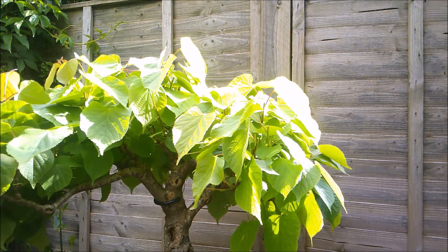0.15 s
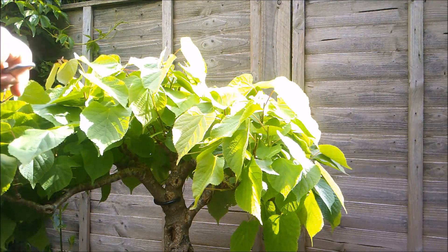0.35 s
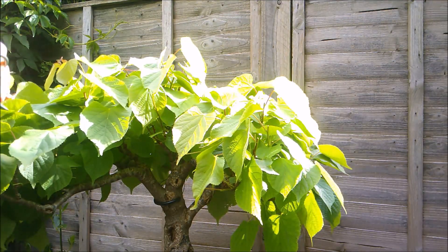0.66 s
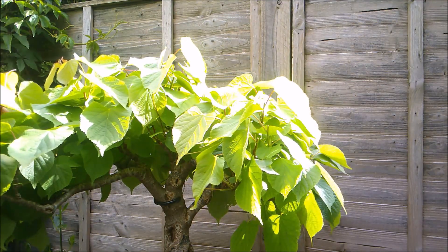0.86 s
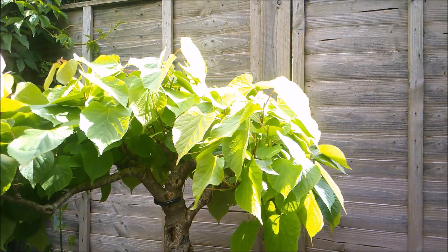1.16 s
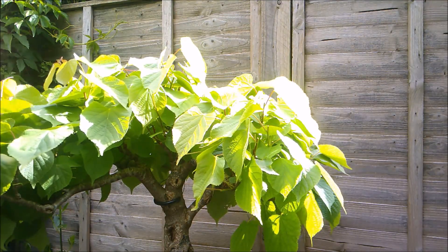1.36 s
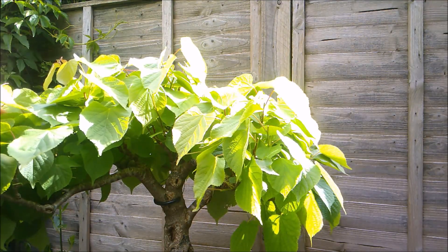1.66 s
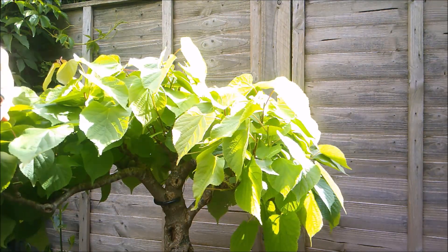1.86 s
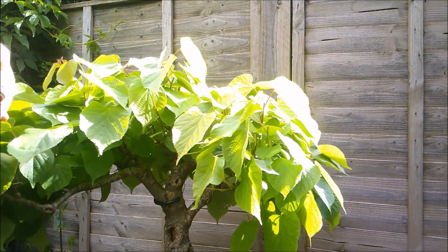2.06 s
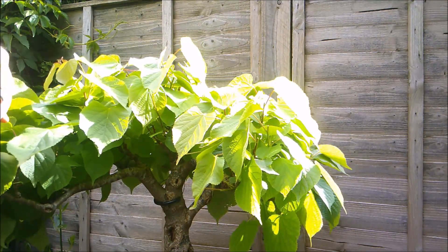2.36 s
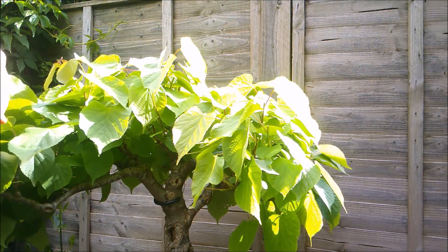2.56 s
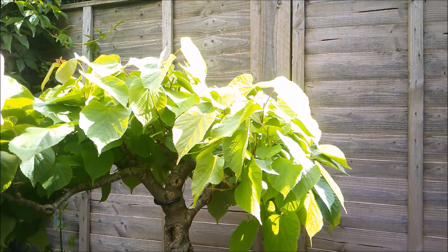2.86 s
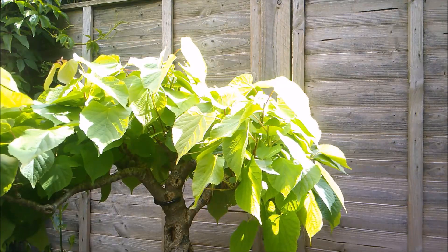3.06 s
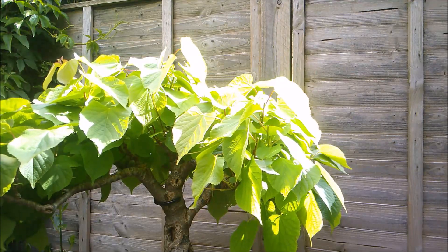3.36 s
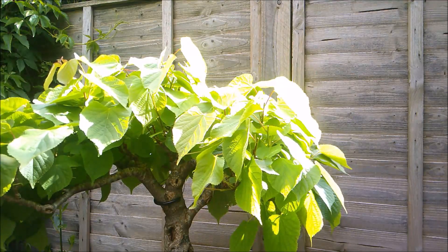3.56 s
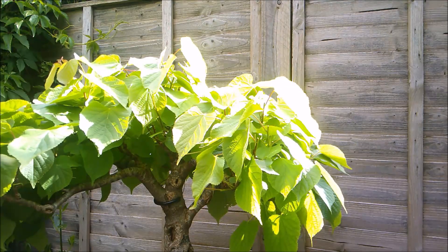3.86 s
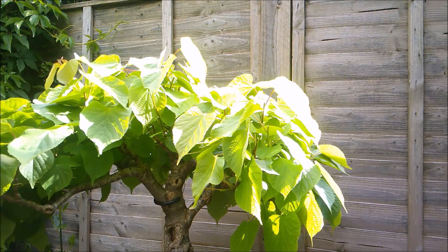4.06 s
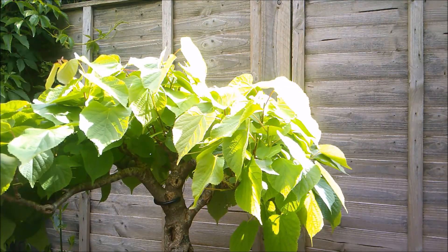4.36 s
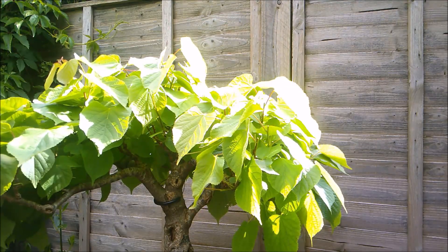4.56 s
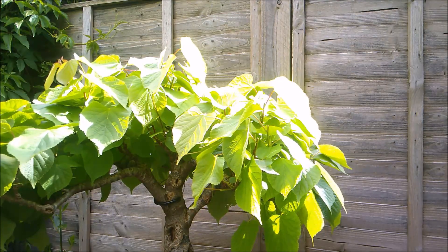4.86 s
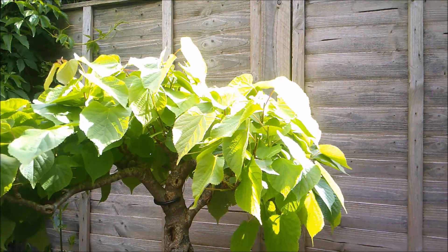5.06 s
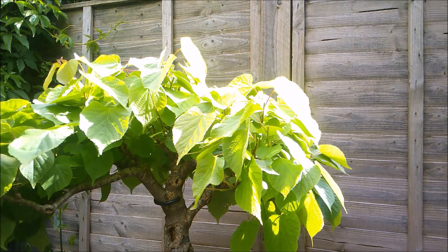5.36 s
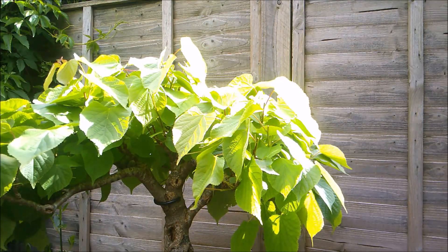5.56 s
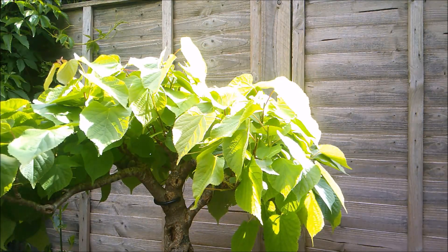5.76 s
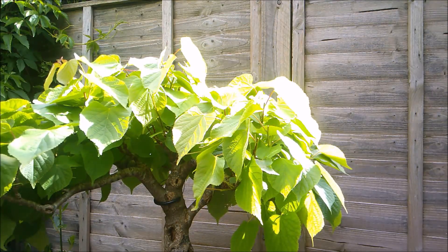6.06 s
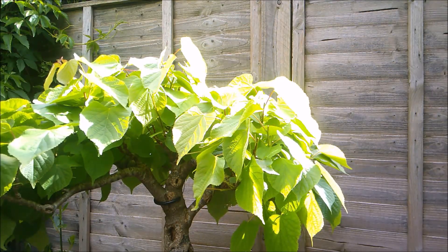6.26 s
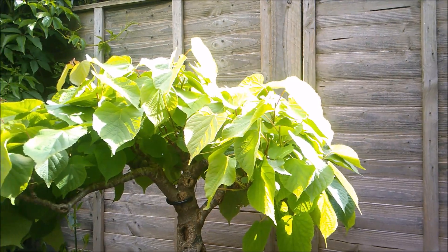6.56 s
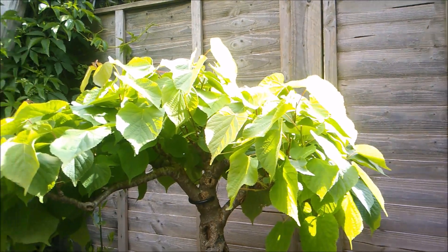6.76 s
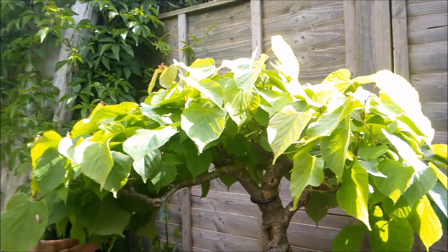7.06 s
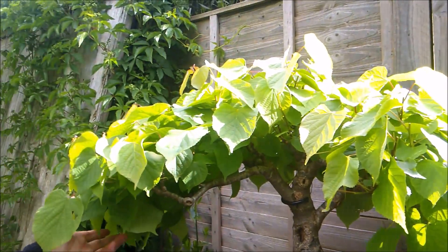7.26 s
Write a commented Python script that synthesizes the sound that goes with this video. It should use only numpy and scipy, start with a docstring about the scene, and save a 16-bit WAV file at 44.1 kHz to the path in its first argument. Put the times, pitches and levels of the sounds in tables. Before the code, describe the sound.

Hands rustle through broad leaves in a garden, stalks ticking and leaves flapping, with two small scissor snips over low wind rumble.

```python
"""In a garden, small scissors snip two shoots in the crown of a bonsai: clicks, noise cuts, squeaks, steel modes.
A hand works through the broad leaves: random slips rub and fizz, noise bands bend, narrow bands slide.
Stalks tick as shaped clicks; leaves flap and a twig is tapped as short damped modes.
Light wind rumbles on the microphone as gusted low noise over the steady outdoor hum, also coloured noise.
A wooden fence close behind adds a brief echo to the scissors, ticks, flaps and tap."""
import sys
import numpy as np
from scipy import signal
from scipy.fft import rfft, irfft
from scipy.io import wavfile
from scipy.ndimage import uniform_filter1d

SR = 44100
rng = np.random.default_rng(int(sys.argv[2]) if len(sys.argv) > 2 else 0)


def master_out(mix):
    """Clip the mix to full scale and print it as 16-bit PCM to the path in sys.argv[1]."""
    frames = np.transpose(np.atleast_2d(mix))
    ceiling = np.clip(frames, -1, 1)
    pcm = np.round(ceiling * 32767).astype(np.int16)
    wavfile.write(sys.argv[1], SR, pcm)


N = 326781
TIME_S = np.arange(N) / SR


def amp(db):
    """Converts dB to an amplitude factor."""
    return 10 ** (np.asarray(db) / 20)


def evened(x):
    """Scales to rms 1."""
    return x / np.sqrt(np.mean(x ** 2) + 1e-20)


def peaked(x):
    """Scales to peak 1."""
    return x / (abs(x).max() + 1e-20)


def add(mix, start_s, sound):
    """Mixes a sound in at a time, cut at the end of the mix."""
    part = mix[max(round(start_s * SR), 0):][:len(sound)]
    part += sound[:len(part)]


def coloured(x, points):
    """Weights the spectrum of x by a curve, straight in dB over log frequency; rms 1."""
    f_hz, level_db = np.transpose(points)
    axis_hz = np.fft.rfftfreq(len(x), 1 / SR)
    gain_db = np.interp(np.log(axis_hz + 1), np.log(f_hz + 1), level_db, left=-100, right=-100)
    return evened(irfft(rfft(x) * amp(gain_db), len(x)))


def drift(corner_hz):
    """Slow random wander of rms 1: noise low-passed above the corner."""
    lowpass = 1 / (1 + (np.fft.rfftfreq(N, 1 / SR) / corner_hz) ** 4)
    return evened(irfft(rfft(rng.standard_normal(N)) * lowpass, N))


def crackle(per_s, spread_db):
    """Tiny slips as impulses of random time, size and sign; rms 1."""
    size = amp(spread_db * np.minimum(rng.exponential(1, N), 4))
    sign = rng.choice([-1., 1.], N)
    slipping = rng.random(N) < per_s / SR
    return evened(size * sign * slipping)


def ring(hz, t60_s):
    """One struck mode: a sine decaying 60 dB in t60."""
    t = np.arange(SR // 10) / SR
    return np.sin(2 * np.pi * hz * t) * np.exp(-np.log(1000) * t / max(t60_s, 1e-4))


def air():
    """Gains of rumble and buffeting: bell-shaped gusts over a steady breeze, summed as power."""
    # gusts: crest t/s, half-width to 1/e power/s, relative rumble level/dB, relative buffeting level/dB
    gusts = [(0.15, 0.34, -30, -48.5), (2.199, 1, -35, -59), (3.1, 0.73, -36.5, -51),
             (4.32, 0.043, -36, -38), (4.53, 0.083, -32.5, -41.5), (5.198, 0.79, -30.5, -37),
             (5.95, .65, -37, -44.5), (7.05, 0.47, -47, -46)]
    breeze_db = [-42, -55]  # rumble, buffeting
    power = amp(breeze_db)[:, None] ** 2 * np.ones(N)
    for crest_s, width_s, *levels_db in gusts:
        bell = np.exp(-((TIME_S - crest_s) / width_s) ** 2)
        power += amp(levels_db)[:, None] ** 2 * bell
    return np.sqrt(power)


def wind():
    """Slow eddies on the microphone as low noise, with lumpy buffeting above them."""
    # rumble spectrum: f/Hz, relative density/dB
    gust_curve = [(9, -4), (22, 2), (32, -3), (46, -2), (56, -5), (85, -19), (200, -55)]
    # buffeting spectrum: f/Hz, relative density/dB
    buffet_curve = [(25, -14), (58, 0), (80, -1), (115, -4), (145, -12), (220, -18), (400, -32), (900, -65)]
    rumble, buffeting = air()
    gust = coloured(rng.standard_normal(N), gust_curve) * rumble * amp(-1.5)
    lumpy = rng.standard_normal(N) * amp(2.6 * drift(12.0))
    buffet = coloured(lumpy, buffet_curve) * buffeting * amp(-3.5)
    return gust + buffet


def garden():
    """Steady far murmur of the outdoors: coloured noise."""
    # murmur spectrum: f/Hz, relative density/dB
    murmur_curve = [(71, -37), (120, -7.5), (156, -11), (235, -10), (306, -2), (476, -14), (728, -11),
                    (900, -12), (3100, -32.5), (3770, -37), (4830, -47.5), (7250, -39), (7640, -48.5),
                    (8200, -64), (10700, -87), (18000, -120)]
    rms_db = -60.5
    return coloured(rng.standard_normal(N), murmur_curve) * amp(rms_db)


def swell(start_s, length_s, rise_s, fall_s):
    """Gain over time: exponential attack before the start, hold, exponential release."""
    early_s = np.maximum(start_s - TIME_S, 0)
    late_s = np.maximum(TIME_S - start_s - length_s, 0)
    return np.exp(-early_s / max(rise_s, 1e-3) - late_s / max(fall_s, 1e-3))


def hand():
    """Gains of rubbing, fizz and bending: strokes move the leaves touched and, more gently, their neighbours."""
    # strokes through the crown: t/s, length/s, relative levels of rubbing/dB, edge fizz/dB, bending/dB
    strokes = [(0.07, 0.5, -60, -70, -51), (1.079, 0.37, -66.5, -75.5, -59.5), (1.8, 0.46, -78, -86, -54.5),
               (3.063, 0.087, -65.5, -77.5, -56.5), (3.278, 0.32, -61.5, -70, -54.5),
               (3.787, 0.38, -61, -65, -58.5), (4.214, 0.28, -63, -74, -49.5),
               (4.878, 0.1, -56, -64, -47.5), (5.264, 0.38, -75.5, -83.5, -55.5),
               (7.342, .08, -70, -80, -66)]
    reach_s, release_s = 0.057, 0.067  # time constants of pressing in and letting go
    # neighbours stir before each stroke and sway on after it
    sway_db, sway_lead_s, sway_s = -4, 0.54, 0.79
    power = np.zeros((3, N))
    for start_s, length_s, *levels_db in strokes:
        touched = swell(start_s, length_s, reach_s, release_s)
        neighbours = amp(sway_db) * swell(start_s, length_s, sway_lead_s, sway_s)
        power += amp(levels_db)[:, None] ** 2 * (touched ** 2 + neighbours ** 2)
    return np.sqrt(power)


def patchy(x, depth_db):
    """Each leaf favours its own band for a moment: smoothed random gains over time and frequency; rms 1."""
    z = signal.stft(x, nperseg=512)[2]
    field = uniform_filter1d(rng.standard_normal(z.shape), size=8, axis=0)
    field = evened(uniform_filter1d(field, size=10, axis=1))
    return evened(signal.istft(z * amp(depth_db * field), nperseg=512)[1][:N])


def leaves():
    """Leaf slips over leaf in clumps; the same slips sound in the blade and as fizz from its edge."""
    # leaf blade spectrum: f/Hz, relative density/dB
    blade_curve = [(410, -20), (700, 2.5), (896, -1.5), (1260, -4), (1630, -2.5), (2140, -5), (2350, -6.5),
                   (3570, -11.5), (4380, -21.5), (5000, -28.5), (6500, -44), (11000, -120)]
    # leaf edge spectrum: f/Hz, relative density/dB
    edge_curve = [(3500, -42), (4800, -27.5), (5700, -11), (6500, -3), (7300, 2), (7800, -6), (8300, -17.5)]
    # bending foliage spectrum: f/Hz, relative density/dB
    bend_curve = [(88, -30), (150, -5), (231, -2.5), (435, -4.5), (510, -4), (763, -13), (886, -16.5),
                  (1400, -18.5), (1820, -45.5), (3080, -120)]
    rubbing, fizzing, bending = hand()
    slips = crackle(per_s=1400, spread_db=4.5) + .8 * rng.standard_normal(N)
    slips = patchy(slips * amp(1.3 * drift(22)), depth_db=2.5)
    rub = coloured(slips, blade_curve) * rubbing * amp(2.0)
    fizz = coloured(slips * amp(1.6 * drift(19)), edge_curve) * fizzing
    # leaves bend and buckle lower down as the hand pushes them aside
    bends = crackle(per_s=400, spread_db=2.5) + 1.2 * rng.standard_normal(N)
    bends = patchy(bends * amp(0.41 * drift(7)), depth_db=2.03)
    bend = coloured(bends, bend_curve) * bending * amp(-0.95)
    return rub + fizz + bend


def slides():
    """A leaf dragged over another or along a stem: friction sings roughly in one resonance."""
    # drags: t/s, length/s, f/Hz, relative width/Hz, rms level before the fades/dB
    drags = [(0.105, 0.23, 1375, 150, -50.5), (0.31, 0.05, 1340, 153, -50.5),
             (0.173, 0.095, 2670, 1270, -53.5), (0.362, .11, 473, 197, -44), (3.175, 0.086, 235, 201, -48),
             (3.439, 0.098, 1280, 1540, -55), (4.391, 0.066, 1380, 1430, -52.5),
             (4.959, 0.081, 2190, 1320, -49), (7.116, 0.12, 2790, 593, -73)]
    out, axis_hz = np.zeros(N), np.fft.rfftfreq(N, 1 / SR)
    for start_s, length_s, hz, width_hz, rms_db in drags:
        slips = rfft(crackle(per_s=1400, spread_db=0.5))
        resonance = 1 / (1 + ((axis_hz - hz) / (1.24 * width_hz)) ** 2) ** 2
        voice = irfft(slips * resonance, N)[:int(length_s * SR)]
        fades = signal.windows.tukey(len(voice), .5)
        add(out, start_s, amp(rms_db) * evened(voice) * fades)
    return out


def snap(treble_db):
    """Minimum-phase click with the colour of snapping tissue; a crisper one has more treble."""
    # dry snap of a shoot or stalk: f/Hz, relative density/dB
    snap_curve = [(130, -23), (330, -11.5), (1100, 3.5), (2000, 0.5), (2700, 1.5), (3150, -5.5),
                  (3800, -7.5), (4700, -19), (5400, -16), (6600, -7.5), (7500, -5.5), (8300, -25.5)]
    f_hz, level_db = np.transpose(snap_curve)
    axis_hz = abs(np.fft.fftfreq(2048, 1 / SR))
    gain_db = np.interp(axis_hz, f_hz, level_db, left=-35, right=-60)
    gain_db += (treble_db + 20.5) * np.interp(axis_hz, [2200, 5500], [0, 1])
    # the Hilbert transform of the log gain gives the phase
    spectrum = np.exp(np.conj(signal.hilbert(np.log(amp(gain_db)))))
    return np.fft.ifft(spectrum).real[:1024]


def ticks():
    """Leaf edges and stalks flick: a click and the stalk's brief skid after it lets go."""
    # flicks: t/s, relative peak level/dB, relative treble/dB
    flicks = [(0.2174, -43, -14.5), (1.1223, -44.5, -47), (3.4922, -36.5, -31), (3.7673, -36, -32),
              (4.322, -36, -15), (4.348, -38, -19), (4.8604, -28.5, -32.5), (4.9149, -26, -16.5),
              (5.341, -39.5, -20), (5.456, -44.5, -29), (5.5844, -39.5, -36.5), (5.733, -43, -55),
              (6.472, -42.5, -26), (7.29, -58, -7)]
    out, t = np.zeros(N), np.arange(SR // 30) / SR
    for start_s, peak_db, treble_db in flicks:
        skid = .04 * rng.standard_normal(len(t)) * np.exp(-t / .004)
        release = skid + (t == 0)
        tick = signal.fftconvolve(release, snap(treble_db + 2.0))
        add(out, start_s, amp(peak_db + 1.5) * peaked(tick))
    return out


def flaps():
    """Broad leaves flap: a dead low note of damped modes and a noise slap from the leaf's face."""
    # flaps: t/s, relative peak level/dB, main mode f/Hz
    leaf_flaps = [(0.283, -26, 184), (0.395, -44, 440), (0.443, -32, 460), (0.927, -35.5, 177),
                  (1.382, -41.5, 317), (1.522, -35, 286), (2.903, -35.5, 357), (3.196, -34, 236),
                  (4.029, -27.5, 300), (4.976, -26, 341), (5.004, -29, 182), (5.411, -26.5, 340),
                  (5.659, -33.5, 186), (6.897, -38, 177), (7.182, -40.5, 292)]
    # leaf face landing: f/Hz, relative density/dB
    slap_curve = [(120, -10), (400, 12), (800, -2), (1500, -8), (2500, -25.5), (4000, -50.5)]
    out, t = np.zeros(N), np.arange(SR // 30) / SR
    for start_s, peak_db, hz in leaf_flaps:
        note = ring(hz, 0.037) - 0.3 * ring(hz * 2.1, 0.025) + 0.1 * ring(hz * 0.17, 0.011)
        add(out, start_s, amp(peak_db - 1.5) * peaked(note))
        # the face lands over a few milliseconds
        landing = np.exp(-t / 0.0043) * (1 - np.exp(-t / 0.00068))
        slap = coloured(rng.standard_normal(len(t)), slap_curve) * landing
        add(out, start_s, amp(peak_db - 9.5) * peaked(slap))
    return out


def steel():
    """Short ring of the blades, damped by the fingers; neighbouring modes start in opposite directions."""
    # blade modes: f/Hz, relative level/dB, t60/s
    modes = [(430, -8, .012), (1060, 1, .011), (2140, -1, .016), (2420, -10, .016), (3650, -9, .007),
             (5400, -5, .007), (6100, -11, .008), (7420, -12, .009)]
    return peaked(sum((-1) ** k * amp(level_db) * ring(hz, t60_s)
                      for k, (hz, level_db, t60_s) in enumerate(modes)))


def scissors():
    """Blades touch, crunch through the fibres as snap-coloured noise, squeak as sine bursts and meet the stop."""
    # blade contacts, first touch to stop: t/s, relative crack peak/dB, relative treble/dB, steel ring peak/dB
    contacts = [(2.888, -45, -12, -55), (2.898, -31, -15, -33), (2.9082, -26, -11, -29),
                (4.555, -37, -7, -42), (4.5668, -33, -16, -26), (4.5711, -17.5, -12, -11.8),
                (4.578, -38, -20, -31)]
    # blades shearing through a shoot: t/s, length/s, rms level/dB
    shears = [(2.892, .010, -46), (2.911, .007, -48), (4.562, .005, -47), (4.5667, .007, -34)]
    # steel squeaking on steel as the blades close: t/s, length/s, f/Hz, peak level/dB
    squeaks = [(2.9086, .003, 7350, -21), (4.5715, .0032, 7400, -28)]
    out = np.zeros(N)
    for start_s, crack_db, treble_db, ring_db in contacts:
        add(out, start_s, amp(crack_db - 0.5) * peaked(snap(treble_db)))
        add(out, start_s, amp(ring_db) * steel())
    fibre = snap(treble_db=-15.0)
    fibre = fibre / np.linalg.norm(fibre)
    for start_s, length_s, rms_db in shears:
        tearing = rng.standard_normal(int(length_s * SR))
        add(out, start_s, amp(rms_db) * signal.fftconvolve(tearing, fibre))
    for start_s, length_s, hz, peak_db in squeaks:
        t = np.arange(int(length_s * SR)) / SR
        add(out, start_s, amp(peak_db) * np.sin(2 * np.pi * hz * t) * np.hanning(len(t)))
    return out


def taps():
    """A twig is tapped: a short knock of four damped modes."""
    # taps: t/s, relative peak level/dB, main mode f/Hz
    twig_taps = [(6.471, -31, 1500)]
    out = np.zeros(N)
    for start_s, peak_db, hz in twig_taps:
        knock = ring(hz, 0.011) - 0.54 * ring(670, 0.016)
        knock += -0.29 * ring(3600, 0.0013) + 0.13 * ring(6800, 0.0068)
        add(out, start_s, amp(peak_db - 3.5) * peaked(knock))
    return out


def fence(x, wet_db, t60_s):
    """Foliage and fence scatter a brief, thin echo: sparse random reflections with a fast and a weak slow decay."""
    t = np.arange(SR // 4) / SR
    reflecting = (rng.random(len(t)) < 4000 / SR) * (t > .002)  # 4000 per second, after 2 ms
    reflections = rng.standard_normal(len(t)) * reflecting
    fast = np.exp(-np.log(1000) * t / t60_s)
    slow = amp(-20) * np.exp(-np.log(1000) * t / .2)
    tail = reflections * (fast + slow)
    return x + amp(wet_db) * signal.fftconvolve(x, tail / np.linalg.norm(tail))[:N]


def scene():
    """Sums all sources to one channel; only the short impacts and the scissors get the echo."""
    snips = fence(scissors(), wet_db=-16, t60_s=.045)
    impacts = fence(ticks() + flaps() + taps(), wet_db=-4.5, t60_s=0.036)
    foliage = impacts + leaves() + slides()
    return (snips + foliage + wind() + garden())[None]


def record(dry):
    """The recorder's band limit: a linear-phase low-pass."""
    edge_hz = 8050
    lowpass = signal.firwin(301, edge_hz, window=("kaiser", 8), fs=SR)
    return signal.oaconvolve(dry, lowpass[None], "same")


dry = scene()
out = record(dry)
master_out(out)
```